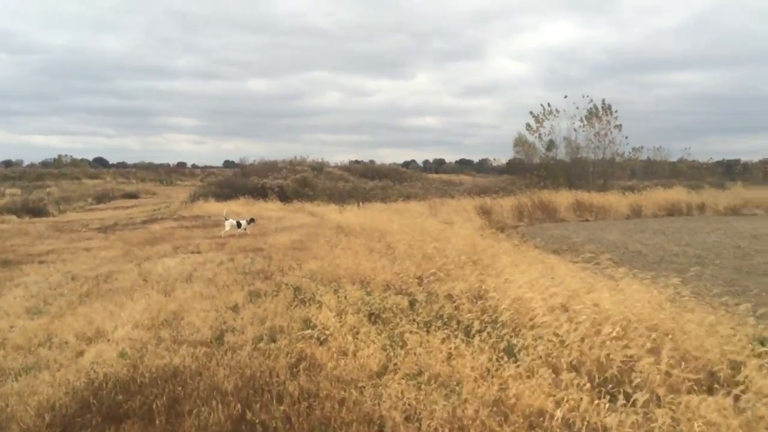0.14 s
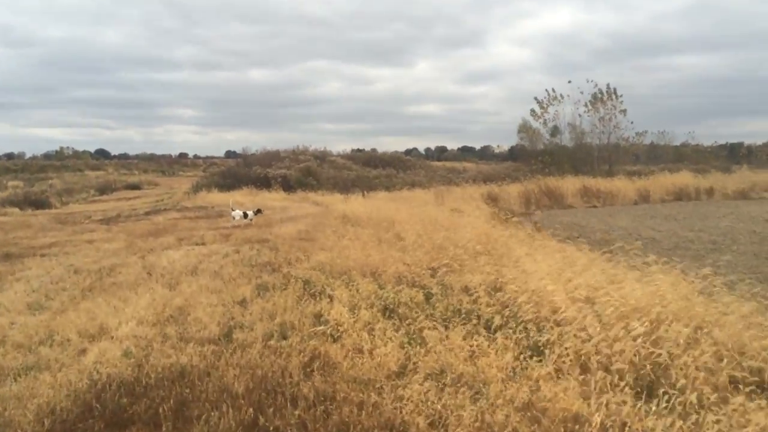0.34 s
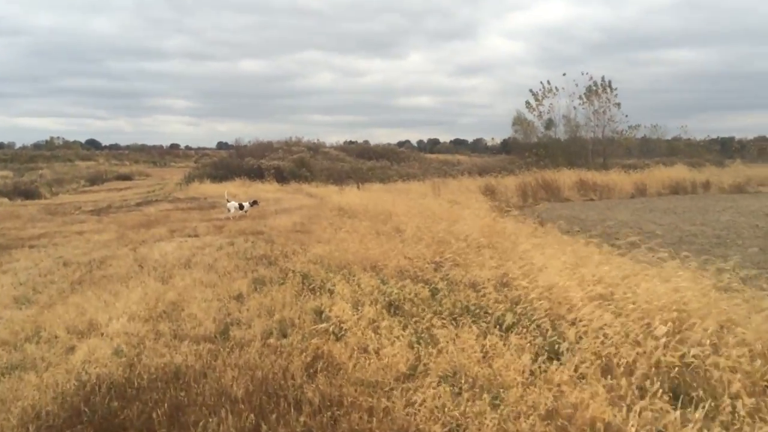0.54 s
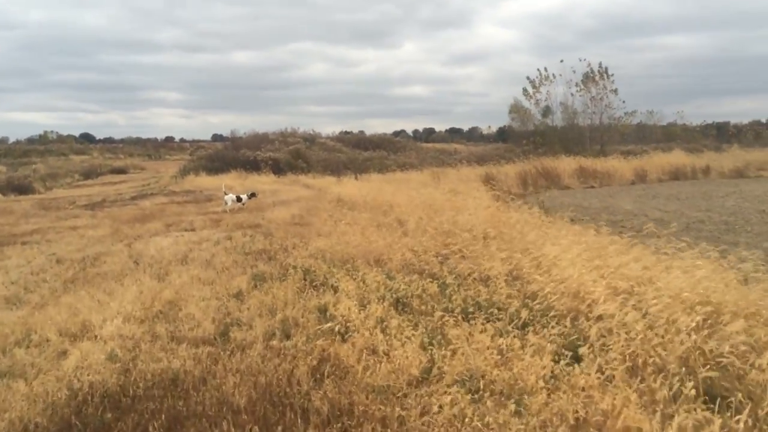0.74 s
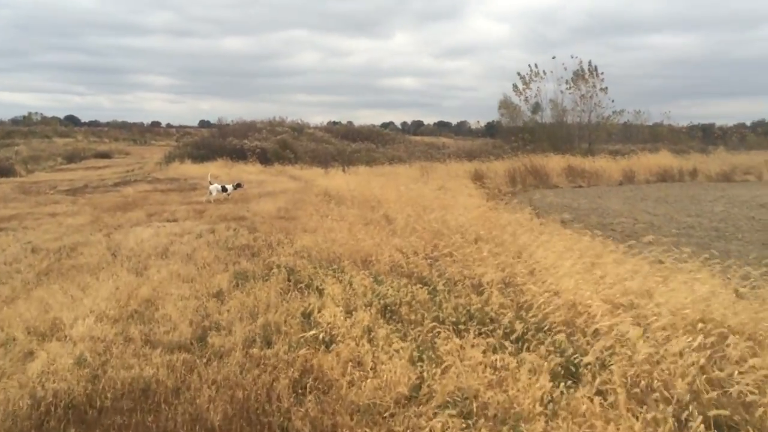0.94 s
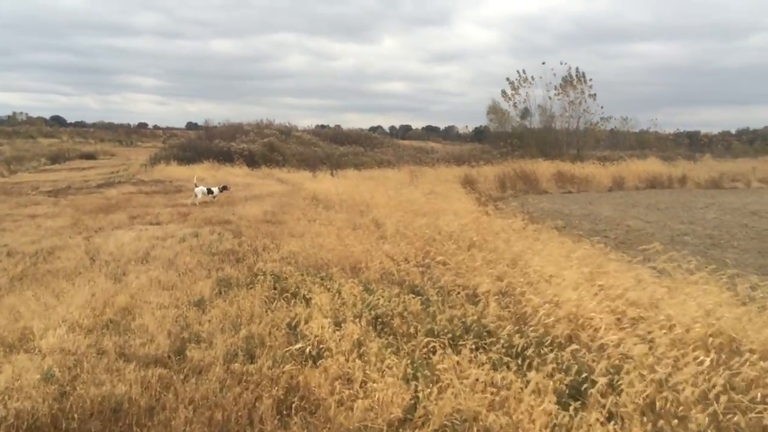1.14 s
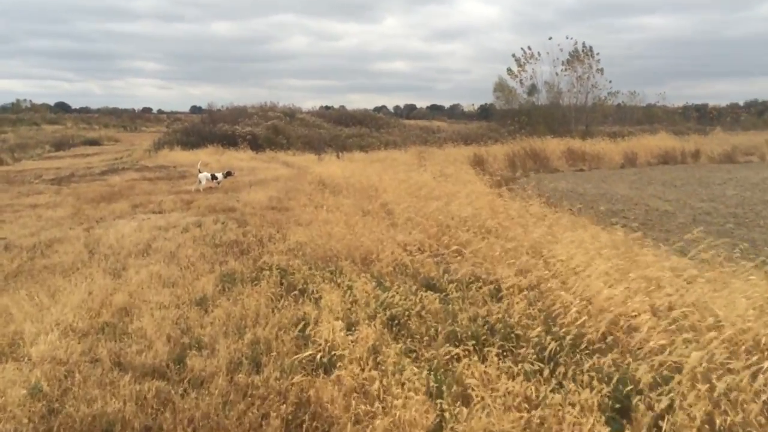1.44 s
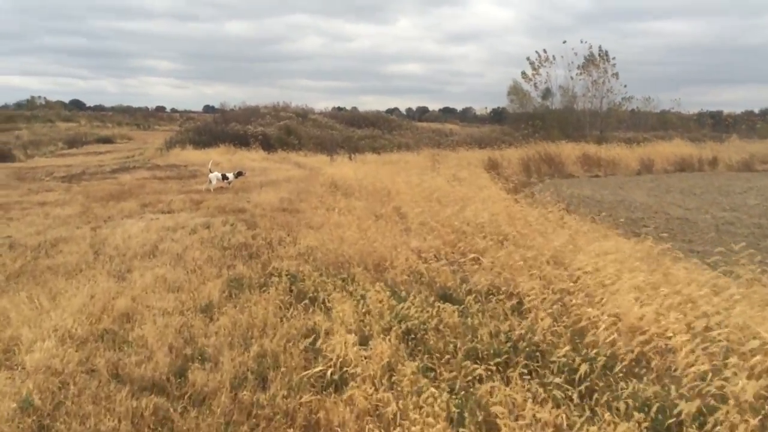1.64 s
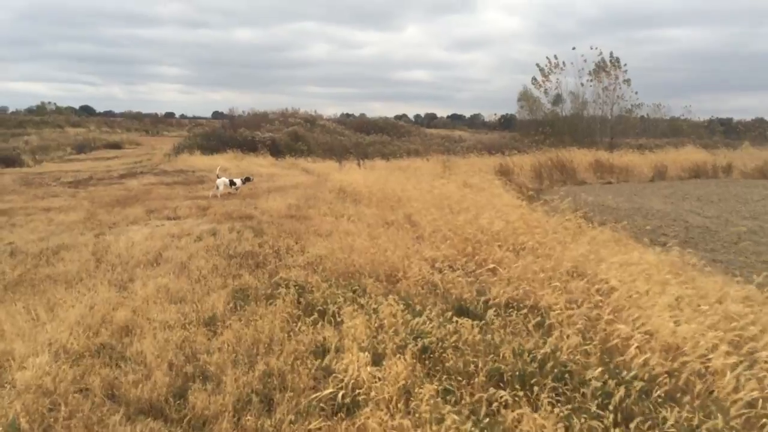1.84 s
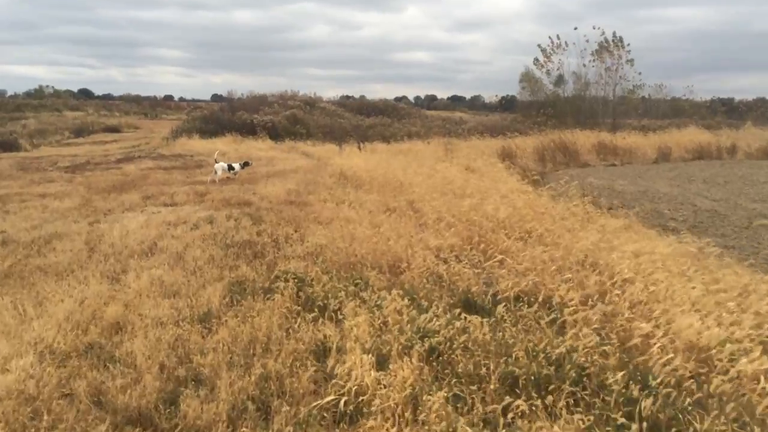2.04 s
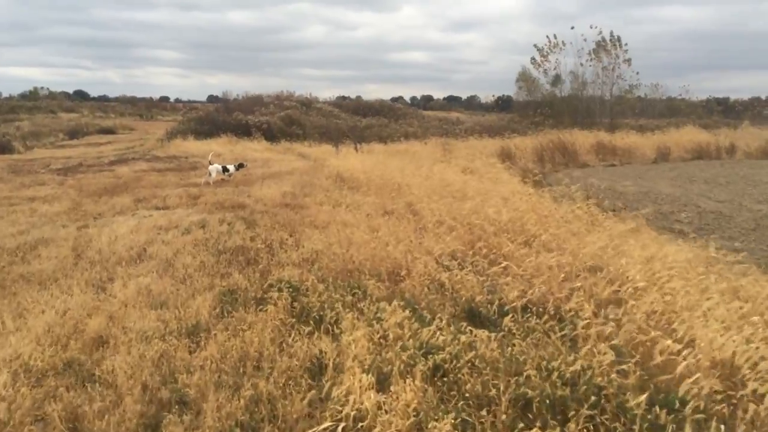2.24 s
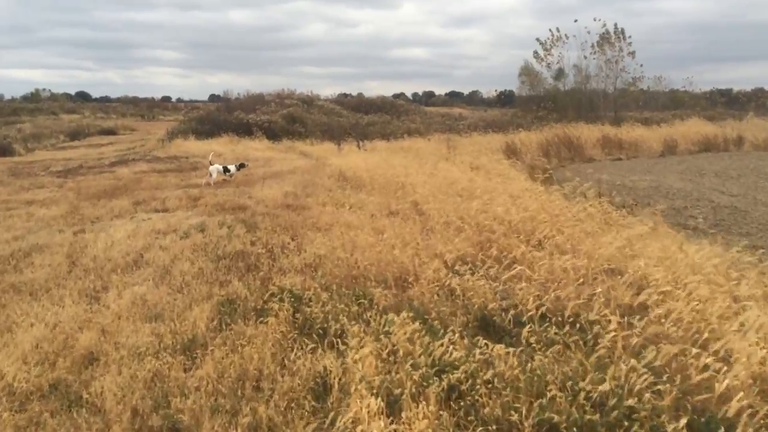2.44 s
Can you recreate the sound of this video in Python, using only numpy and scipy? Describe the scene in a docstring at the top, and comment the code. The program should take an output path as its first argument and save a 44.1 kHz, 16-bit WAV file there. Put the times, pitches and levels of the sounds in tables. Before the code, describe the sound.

Footsteps swish and crunch through tall dry grass close to the microphone, with small stem snaps; wind rumbles and thumps loudly near the start and again near the end, over a quiet open field.

```python
"""Someone walks through tall dry grass in an open field, close to one microphone. The legs sweep the
stalks in a swish of hiss and tiny random crackles; feet crush straw, stalks rub and seed heads brush
past in short resonant bursts of crackle, and single stems snap in decaying ticks of noise. Wind rumbles
on the microphone as shaped noise and twice flares into a burst of low thumps, each a brief sine pulse.
Behind lies open air with a faint distant drone, two narrow bands of noise."""
import sys
import numpy as np
from scipy.fft import rfft, irfft, next_fast_len
from scipy.io import wavfile
from scipy.ndimage import uniform_filter1d, minimum_filter1d, map_coordinates

SR = 44100
rng = np.random.default_rng(int(sys.argv[2]) if len(sys.argv) > 2 else 0)


def bounce(signal):
    """Save signal as a 16-bit WAV file at the path given by the first command-line argument."""
    frames = np.transpose(np.atleast_2d(signal))
    limited = np.clip(frames, -1, 1)
    pcm = np.round(limited * 32767).astype(np.int16)
    wavfile.write(sys.argv[1], SR, pcm)


N = 114660


def amp(db):
    """Decibels to gain."""
    return 10 ** (np.asarray(db) / 20)


def unit(x):
    """Scale to rms 1."""
    return x / np.sqrt(np.mean(x ** 2) + 1e-20)


def clock():
    """Time of each sample in seconds."""
    return np.arange(N) / SR


def curve(rows):
    """Join (seconds, value) rows by straight lines."""
    return np.interp(clock(), *np.transpose(rows))


def wobble(rate):
    """A smooth random curve with rate knots a second."""
    return map_coordinates(rng.standard_normal(4000), [clock() * rate + 2], mode="wrap")


def filtered(x, response):
    """Multiply the spectrum of x by a response of frequency, with padding against wrap-around."""
    m = next_fast_len(N + SR // 2)
    hz = np.fft.rfftfreq(m, 1 / SR)
    return irfft(rfft(x, m) * response(hz), m)[:N]


def coloured(x, spectrum):
    """Shape x by (Hz, dB) points joined on a log frequency axis, at rms 1."""
    f, db = np.transpose(spectrum)
    return unit(filtered(x, lambda hz: amp(np.interp(np.log(hz + 1), np.log(f), db))))


def resonant(x, hz, width):
    """Pass x through the same resonance twice, at rms 1."""
    def response(f):
        damping = 1j * f * width
        return (damping / (hz * hz - f * f + damping)) ** 2
    return unit(filtered(x, response))


def noise():
    """White noise."""
    return rng.standard_normal(N)


def evened(x, size):
    """Noise with its chance swells flattened over size samples."""
    power = uniform_filter1d(uniform_filter1d(x ** 2, size=size), size=size)
    return unit(x / np.sqrt(abs(power) + 0.3))


def crackle(per_s, spread_db):
    """Tiny stalk contacts at random times and of random size."""
    hit = rng.random(N) < per_s / SR
    size_db = spread_db * np.minimum(rng.exponential(size=N), 4)
    return unit(hit * noise() * amp(size_db))


def swell(s, rise, fall):
    """A rounded swell peaking at s, with exponential skirts."""
    t = clock() - s
    u = t / np.where(t < 0, rise, fall)
    return np.exp(2 * (1 - np.sqrt(1 + u * u)))


def swish(hiss_db=-2, grain_db=-4):
    """Legs sweep the grass: a harder sweep is louder and makes more contacts."""
    # How hard the legs sweep. Each row: time in seconds, level in dB.
    sweep = [(0, -52), (.11, -52), (.14, -49), (.19, -49), (.22, -54.5), (.245, -50.5), (.3, -59.5),
             (.35, -68.5), (.45, -60.5), (.5, -52.5), (.55, -52.5), (.615, -48), (.685, -55.5), (.725, -51),
             (.76, -55.5), (.83, -55), (.88, -61.5), (1.03, -64.5), (1.08, -50.5), (1.2, -51.5),
             (1.245, -50), (1.33, -52.5), (1.39, -59.5), (1.5, -64.5), (1.57, -61), (1.66, -49),
             (1.72, -52), (1.8, -55.5), (1.86, -48), (1.92, -53.5), (1.98, -58.5), (2.07, -56.5),
             (2.14, -52), (2.23, -46.5), (2.3, -51), (2.35, -51), (2.39, -59.5), (2.47, -54), (2.5, -65.5),
             (2.6, -54.5)]
    # Colour of dry grass. Each row: frequency in Hz, relative level in dB per Hz.
    grass_spectrum = [(200, -49), (600, 4.5), (1200, 4.5), (2000, 1.5), (3000, -1.5), (5000, -2.5),
                      (8000, -3), (12000, -4.5), (15000, -5.5)]
    flutter_db = .8
    level_db = curve(sweep)
    contacts_per_s = 3500 * amp(0.98 * (level_db - level_db.mean()))
    grains = amp(grain_db) * coloured(crackle(contacts_per_s, spread_db=3.0), grass_spectrum)
    hiss = amp(hiss_db) * coloured(noise(), grass_spectrum)
    return amp(level_db + flutter_db * wobble(70)) * (hiss + grains)


def strokes(rows, relative_width, per_s):
    """Short bursts of crackle, each around its own pitch."""
    out = np.zeros(N)
    for s, db, half, hz in rows:
        grains = crackle(per_s, spread_db=2.5)
        out += amp(db) * swell(s, half, half) * resonant(grains, hz, hz * relative_width)
    return out


def crunches():
    """Feet crush the straw: dense crackle in a broad low resonance."""
    # Each row: peak time in seconds, level in dB, half length in seconds, centre in Hz.
    straw = [(.15, -50, 0.015, 1180), (.61, -52, 0.053, 1420), (.727, -39.5, 0.011, 1000),
             (1.25, -52.5, 0.072, 1090), (1.65, -59, 0.017, 1200), (1.862, -42, 0.015, 880),
             (1.925, -53, .025, 1110), (2.22, -56, 0.059, 1240), (2.295, -46.5, .007, 1520),
             (2.542, -49.5, 0.0077, 910)]
    return strokes(straw, relative_width=0.83, per_s=5000)


def rubs():
    """Stalks rub along a boot: sparser crackle in a narrow resonance."""
    # Each row: peak time in seconds, level in dB, half length in seconds, centre in Hz.
    stalks = [(.595, -52, 0.036, 2070), (1.728, -47.5, 0.013, 1930)]
    return strokes(stalks, relative_width=.22, per_s=2000)


def brushes():
    """Seed heads brush past: very dense crackle in a high resonance."""
    # Each row: peak time in seconds, level in dB, half length in seconds, centre in Hz.
    seed_heads = [(.134, -49.5, 0.01, 12300), (.825, -51.5, 0.017, 9250)]
    return strokes(seed_heads, relative_width=.5, per_s=16000)


def snaps():
    """Each breaking stem gives one dry tick, decaying noise through a broad resonance."""
    # Each row: time in seconds, peak level in dB, centre in Hz.
    stems = [(0.135, -33.5, 11000), (.201, -41, 5000), (.239, -49, 8000), (.2675, -35.5, 1260),
             (.4544, -42, 7350), (0.714, -43, 5000), (.774, -39, 4430), (.7835, -39, 13000),
             (.831, -43, 10000), (1.4012, -41.5, 4400), (1.6147, -40, 7950), (1.688, -38, 4950),
             (1.8293, -37, 11000), (1.861, -33.5, 3050), (1.8911, -38, 9100), (1.936, -40, 7000),
             (2.1844, -36, 9000), (2.527, -45, 11000)]
    decay_s = .0011
    out = np.zeros(N)
    for s, db, hz in stems:
        t = clock() - s
        burst = noise() * (t >= 0) * np.exp(-abs(t) / decay_s)
        tick = resonant(burst, hz, hz * 1.13)
        out += amp(db) * tick / abs(tick).max()
    return out


def wind(rumble_db=-2):
    """A rumble follows the wind's strength; the strongest gusts add brighter turbulence."""
    # Wind at the microphone. Each row: time in seconds, level in dB before rumble_db is added.
    strength = [(0, -37.5), (.06, -30), (.125, -44.5), (.17, -22.5), (.21, -58), (.245, -10.5), (.29, -18),
                (.328, -18.5), (.355, -39.5), (.475, -29.5), (.51, -44.5), (.69, -36), (.77, -43),
                (.86, -34.5), (.945, -24), (.985, -27.5), (1.02, -25.5), (1.06, -30.5), (1.11, -32),
                (1.19, -35.5), (1.23, -32.5), (1.32, -38), (1.375, -25.5), (1.41, -36.5), (1.495, -22.5),
                (1.55, -32), (1.585, -28.5), (1.8, -38.5), (1.85, -30.5), (1.88, -42), (1.96, -37.5),
                (2.03, -42.5), (2.13, -33.5), (2.25, -19), (2.3, -17), (2.35, -23.5), (2.39, -46),
                (2.44, -27.5), (2.49, -39.5), (2.53, -30), (2.6, -43.5)]
    # Gusts breaking into turbulence. Each row: peak time in seconds, level in dB, rise and fall in seconds.
    gusts = [(0.237, -41, 0.0038, 0.0027), (.258, -27, .002, 0.0022), (.273, -14.5, 0.0031, 0.0035),
             (0.298, -21.5, 0.0022, 0.0015), (.308, -36, 0.035, 0.013), (1.4905, -34, 0.0013, 0.0013),
             (2.297, -14.5, 0.015, 0.013)]
    # Colours of the two. Each row: frequency in Hz, relative level in dB per Hz.
    rumble_spectrum = [(15, 0), (30, -27.5), (48, -3), (70, 2), (115, -2), (170, -11.5), (260, -23),
                       (400, -32.5), (800, -51), (2000, -81)]
    turbulence_spectrum = [(50, -33), (130, -5), (280, 2), (520, 3.5), (750, -9), (1100, -24.5),
                           (1800, -41), (4000, -82)]
    flow = evened(coloured(noise(), rumble_spectrum), size=800)
    turbulence = evened(coloured(noise(), turbulence_spectrum), size=400)
    bursts = sum(amp(db) * swell(s, rise, fall) for s, db, rise, fall in gusts)
    return amp(curve(strength) + rumble_db) * flow + bursts * turbulence


def thumps():
    """An eddy pushes on the microphone, then pulls: a sine that fades both ways from its centre."""
    # Each row: centre time in seconds, approximate peak level in dB, pitch in Hz.
    eddies = [(.161, -20.5, 115), (0.238, -17.5, 221), (0.2581, -12, 324), (.273, 0, 185),
              (0.296, -12, 254), (0.324, -18.5, 127), (0.886, -19, 69.6), (0.9307, -16, 97),
              (.965, -20, 106), (1.001, -24.5, 156), (1.029, -32, 124), (1.089, -21, 139),
              (1.373, -20.5, 180), (1.4909, -8, 139), (1.854, -19, 133), (2.171, -20, 129),
              (2.205, -13, 132), (2.234, -14, 146), (2.278, -11, 201), (2.288, -4.5, 200),
              (2.2965, -4.5, 485), (2.31, -10.5, 226)]
    fade = 0.7  # per radian
    out = np.zeros(N)
    for s, db, hz in eddies:
        u = 2 * np.pi * hz * (clock() - s)
        # 1.37 makes up most of what the fade takes from the peak
        out -= amp(db) * np.sin(u) * 1.37 / np.cosh(np.clip(fade * u, -20, 20))
    return out


def field():
    """Open air as coloured noise, with a faint distant drone of narrow noise bands."""
    # Colour of the open air. Each row: frequency in Hz, relative level in dB per Hz.
    air_spectrum = [(20, 3.5), (52, 8), (100, 2), (400, 0), (800, -7.5), (1300, -7), (1700, -12),
                    (2300, -17), (5000, -19.5), (15000, -23)]
    # How the drone comes and goes. Each row: time in seconds, level in dB.
    drone_level = [(0, -86), (.7, -70), (1.1, -57), (1.5, -56), (1.9, -58), (2.6, -69)]
    # Bands of the drone. Each row: centre in Hz, width in Hz, relative level in dB.
    drone_bands = [(779, 174, -1.5), (1630, 140, -7)]
    air_db = -53.5
    air = amp(air_db) * coloured(noise(), air_spectrum)
    drone = sum(amp(db) * resonant(noise(), hz, width) for hz, width, db in drone_bands)
    return air + amp(curve(drone_level)) * drone


def scene():
    """Steps, wind and field at one microphone."""
    feet = crunches() + rubs()
    grass = swish() + brushes() + snaps()
    return (feet + grass + wind() + thumps() + field())[None]


def record(dry):
    """The microphone drops the deepest bass, a limiter holds the biggest thumps, a band limit cuts the top."""
    low_cut_hz, top_hz = 14.6, 15400
    ceiling = .78  # of full scale
    x = filtered(dry[0], lambda hz: hz ** 4 / (hz ** 4 + low_cut_hz ** 4))
    # the limiter looks both ahead and back, then smooths its gain (sizes in samples)
    need = minimum_filter1d(ceiling / np.maximum(abs(x), ceiling), size=300)
    gain = uniform_filter1d(uniform_filter1d(need, size=150), size=150)
    return filtered(x * gain, lambda hz: hz < top_hz)[None]


dry = scene()
out = record(dry)
bounce(out)
```